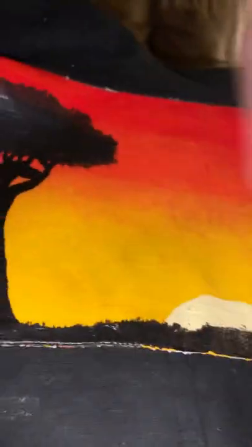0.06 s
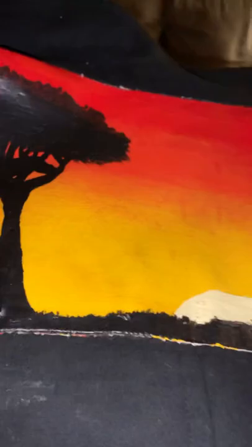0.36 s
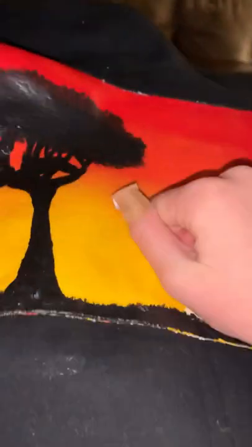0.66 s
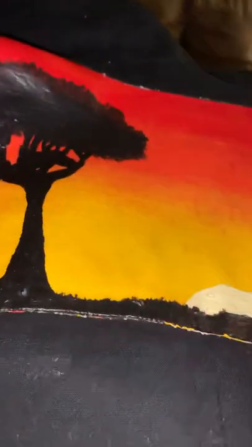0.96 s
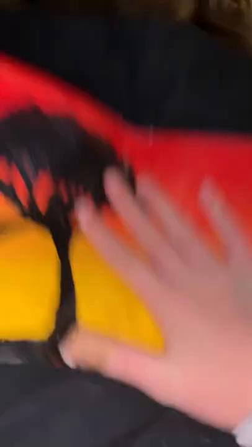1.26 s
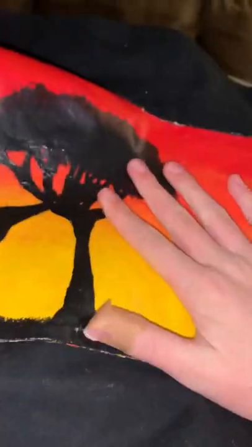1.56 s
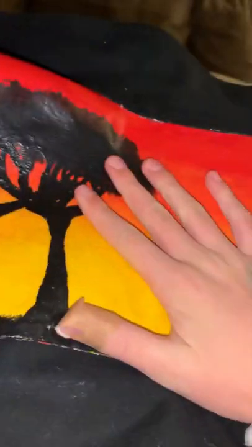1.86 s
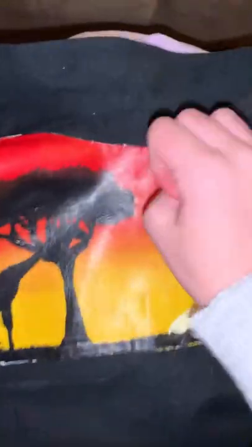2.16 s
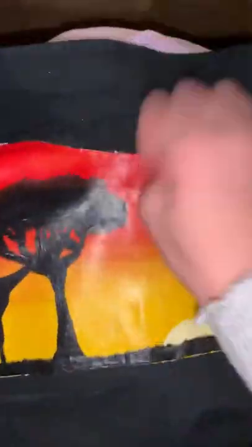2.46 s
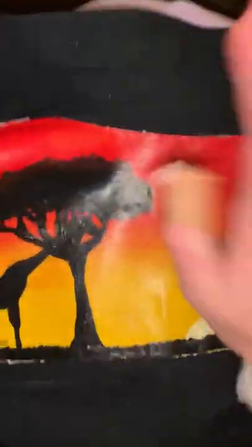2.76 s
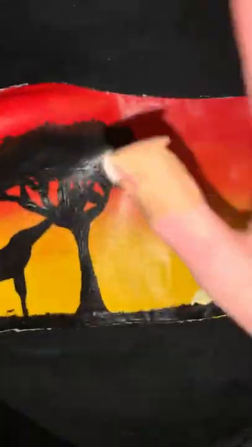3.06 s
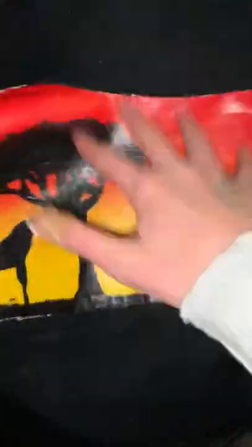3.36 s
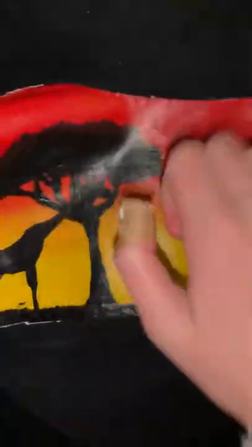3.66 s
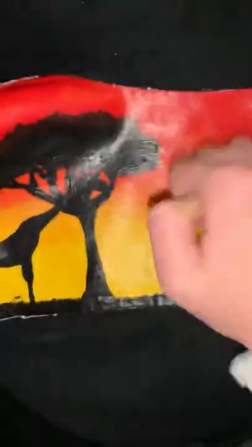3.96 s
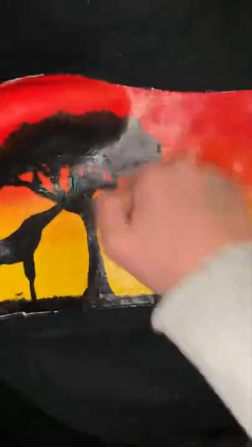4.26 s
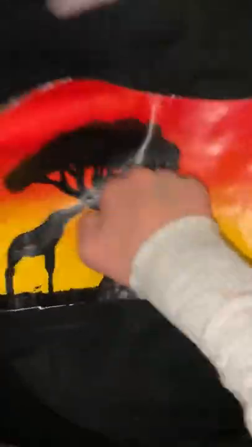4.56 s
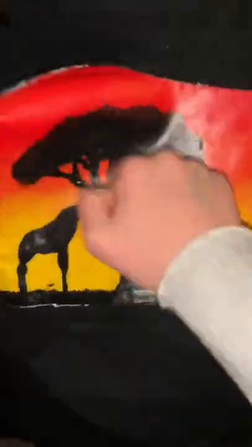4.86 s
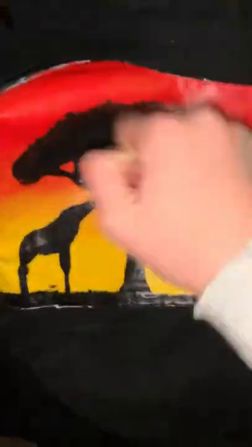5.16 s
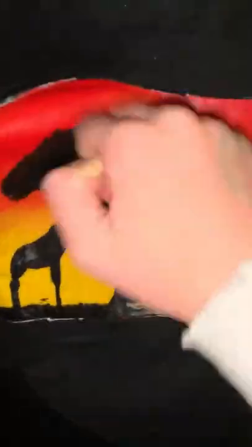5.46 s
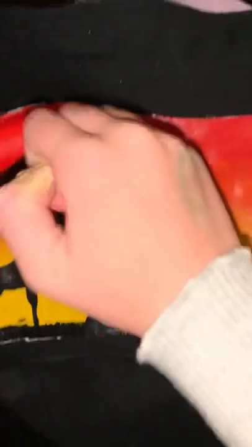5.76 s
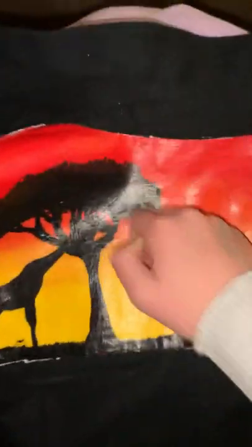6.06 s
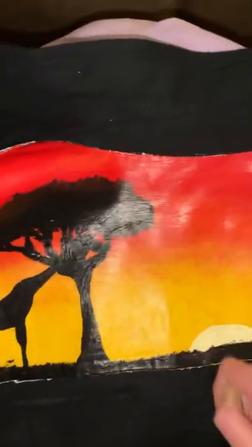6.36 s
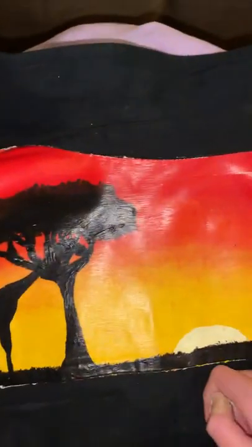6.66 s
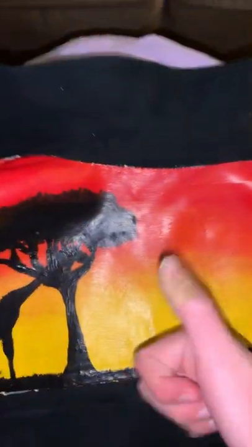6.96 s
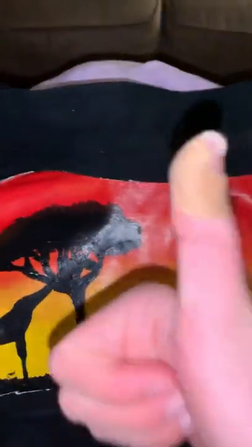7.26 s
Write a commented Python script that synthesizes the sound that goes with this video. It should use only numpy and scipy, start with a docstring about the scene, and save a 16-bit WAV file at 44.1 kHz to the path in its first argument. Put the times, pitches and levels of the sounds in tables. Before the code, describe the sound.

Long fingernails tap sharply on a stiff painted cloth, close up, with light brushing in a quiet room.

```python
"""Long fingernails tap a stiff, sealed painting on cloth lying over a sofa, close to a phone.
Each blow sends a bending wave through the paint skin: treble first, bass last, a short falling 'pock'.
Nails tick, the hand brushes the cloth between blows, and a quiet room answers softly over a low hum.
The phone's two microphone ports hear it all in stereo."""
import sys
import numpy as np
from scipy import signal
from scipy.fft import rfft, irfft, next_fast_len
from scipy.io import wavfile

SR = 44100
rng = np.random.default_rng(int(sys.argv[2]) if len(sys.argv) > 2 else 0)


def wrap_up_sound(samples):
    """Save the sound to the file named by the first command line argument, as 16-bit audio."""
    columns = np.atleast_2d(samples).T
    # keep every value between -1 and 1, then stretch to whole-number steps
    tamed = np.clip(columns, -1, 1)
    steps = np.round(tamed * 32767).astype(np.int16)
    wavfile.write(sys.argv[1], SR, steps)


N = 331627
TAP_SIZE, TAIL_SIZE = 8192, 20480  # samples in one tap and in the room's tail


def undb(db):
    """Decibels to gain."""
    return 10 ** (np.asarray(db) / 20)


def along(points, f):
    """Read a curve of (f/Hz, value) points on a log-frequency axis."""
    hz, value = np.transpose(points)
    return np.interp(np.log(np.maximum(f, 1)), np.log(hz), value)


def colour(x, points):
    """EQ by a curve of (f/Hz, level/dB) points."""
    size = next_fast_len(x.shape[-1], True)
    gain = undb(along(points, np.fft.rfftfreq(size, 1 / SR)))
    return irfft(rfft(x, size) * gain, size)[..., :x.shape[-1]]


def unit(x):
    """Scale to rms 1."""
    return x / np.sqrt(np.mean(x ** 2))


def hump(f, hz, q):
    """Power response of one damped resonance."""
    return 1 / (1 + (q * (f / hz - hz / f)) ** 2)


def causal(gain):
    """The minimum-phase spectrum with this gain: a sharp attack with no pre-ring."""
    cepstrum = irfft(np.log(gain + 1e-6))
    half = len(cepstrum) // 2
    cepstrum[1:half] *= 2
    cepstrum[half + 1:] = 0
    return np.exp(rfft(cepstrum))


def add(track, s, x):
    """Mix x into the track, starting at s seconds."""
    i = int(s * SR)
    track[..., i:i + x.shape[-1]] += x[..., :N - i]


def diffuse(size):
    """Noise from all sides: near mono in the bass, widest in the mids."""
    # stereo width of diffuse sound: f/Hz, side over mid/dB
    width = [(60, -26.5), (200, -20), (400, -8.5), (750, 2), (2500, -6), (4500, -10.5), (8000, -12)]
    mid, side = rng.standard_normal((2, size))
    side_gain = undb(along(width, np.fft.rfftfreq(size, 1 / SR)))
    left_right = rfft(mid) + np.array([[1], [-1]]) * side_gain * rfft(side)
    return irfft(left_right / np.sqrt(1 + side_gain ** 2), size)


def room_tone(level_db=-51.5):
    """The bed: the low, steady hum and air of the house."""
    # tone of the hum and air: f/Hz, level/dB
    hum_eq = [(24, -28.5), (34, -19.5), (52, -2), (78, -12.5), (108, -5), (149, -4.5), (180, -11),
              (256, -12), (363, -26.5), (607, -33), (1070, -33), (1520, -28), (2280, -36.5), (4740, -64.5),
              (6380, -55.5), (12000, -56), (16000, -68.5)]
    hum = colour(diffuse(next_fast_len(N, True)), hum_eq)
    return undb(level_db) * unit(hum)[:, :N]


def reverb(x, wet_db=-17.5, predelay_s=.003, build_s=0.0034):
    """A furnished room, from a new spot each time: echoes thicken, each octave dies at its own rate."""
    # tone of the reflections: f/Hz, level/dB
    tail_eq = [(50, -16), (120, -0.5), (250, -3.5), (450, -7), (800, 3.5), (1400, -7), (2500, -1.5),
               (5000, -2.5), (12000, -4)]
    # the room's decay: f/Hz, time to fall 60 dB/s
    t60 = [(100, 0.4), (300, .47), (700, 0.47), (1800, 0.51), (5000, 0.38), (12000, 0.34)]
    t = np.arange(TAIL_SIZE) / SR
    f = np.maximum(np.fft.rfftfreq(TAIL_SIZE, 1 / SR), 1)
    noise = rfft(colour(diffuse(TAIL_SIZE), tail_eq))
    tail = 0
    for hz in 32 * 2. ** np.arange(10):
        octave = np.maximum(1 - np.abs(np.log2(f / hz)), 0)
        decay = np.exp(-np.log(1000) * t / along(t60, hz))
        tail = tail + irfft(noise * octave) * decay
    tail *= np.clip((t - predelay_s) / build_s, 0, 1)
    tail *= undb(wet_db) / np.sqrt(np.sum(tail ** 2) / 2)
    return signal.fftconvolve(x[None], tail, axes=1)[:, :N]


def cloth_hiss(size, grain_db=3, grain_samples=64):
    """Threads catch and slip: bright, grainy noise of rms 1."""
    # tone of the slipping threads: f/Hz, level/dB
    thread_eq = [(1000, -23), (3000, -4), (4800, -2), (6300, 1.5), (8500, -8), (11000, -4.5), (15000, -10)]
    catches_db = grain_db * rng.standard_normal(size // grain_samples + 1)
    catches = undb(np.repeat(catches_db, grain_samples)[:size])
    return unit(colour(rng.standard_normal(size) * catches, thread_eq))


def brushing(attack_share=.3):
    """The hand slides on the cloth: hiss over the sheet's dull rub, swelling fast and fading slowly."""
    # strokes of skin and sleeve: peak t/s, length/s, hiss level/dB, rub level/dB
    strokes = [(0.139, 0.067, -50.5, -57.5), (.232, .02, -69, -70.5), (.64, 0.071, -75.5, -79.5),
               (0.755, 0.031, -67.5, -50.5), (2.066, 0.064, -87, -49), (2.662, .016, -68, -81.5),
               (6.146, 0.12, -59.5, -57.5), (6.304, .06, -73.5, -57.5)]
    # tone of the rubbed sheet: f/Hz, level/dB
    rub_eq = [(60, -11.5), (150, 10), (400, -0.5), (750, -4.5), (1500, -16), (4000, -27), (10000, -52.5)]
    t = np.arange(N) / SR
    threads = cloth_hiss(N)
    rub = unit(colour(rng.standard_normal(N), rub_eq))
    out = np.zeros(N)
    for s, length, hiss_db, rub_db in strokes:
        slope_s = length * np.where(t < s, attack_share, 1 - attack_share)
        pressure = np.exp(-((t - s) / slope_s) ** 2)
        out += pressure * (undb(hiss_db) * threads + undb(rub_db) * rub)
    return out


def rustle(attack_s=0.014, fade_s=0.042):
    """The cloth shifts and settles after a blow."""
    t = np.arange(TAP_SIZE) / SR
    attack = np.minimum(t / attack_s, 1)
    release = np.exp(-(np.maximum(t - attack_s, 0) / fade_s) ** 2)
    return cloth_hiss(TAP_SIZE) * attack * release


def creases(pock, scatter_db=-9, fade_s=0.0039, crossover_hz=900):
    """Creases in the paint scatter the short waves, differently at every spot."""
    t = np.arange(TAP_SIZE) / SR
    f = np.fft.rfftfreq(TAP_SIZE, 1 / SR)
    echoes = rng.standard_normal(TAP_SIZE) * np.exp(-t / fade_s)
    echoes *= undb(scatter_db) / np.sqrt(np.sum(echoes ** 2))
    short_waves = f ** 2 / (f ** 2 + crossover_hz ** 2)
    return irfft(rfft(pock) * (1 + short_waves * rfft(echoes)))


def bending_wave(f, travel_ms, dispersion=.6):
    """Spectrum of a path across the sheet that takes travel_ms at 1 kHz; the bass arrives last."""
    turns_per_ms = (f / 1000) ** (1 - dispersion) / (1 - dispersion)
    return np.exp(-2j * np.pi * turns_per_ms * travel_ms)


def tap(force_db, knock_hz, thump_db, clack_hz, clack_db, snap_db, tick_db, detour_ms, reflection):
    """One nail contact: heavily damped resonances and a gritty tick, spread into a falling chirp."""
    f = np.maximum(np.fft.rfftfreq(TAP_SIZE, 1 / SR), 1)
    t = np.arange(TAP_SIZE) / SR
    thump = undb(thump_db) * hump(f, hz=79.7, q=0.77)  # the sheet sinks into the cushion
    knock = hump(f, knock_hz, q=0.71) ** 2  # the paint skin flexes
    clack = undb(clack_db) * hump(f, clack_hz, q=1.6) ** 2  # the dent under the nail
    snap = undb(snap_db) * hump(f, hz=3360, q=0.62) ** 2  # the nail itself
    body = causal(thump + knock + clack + snap)
    # the nail's edge skids over the grain of the paint for a few milliseconds
    grit = rng.standard_normal(TAP_SIZE) * np.exp(-t / 0.0015)
    grit /= np.sqrt(np.sum(grit ** 2))
    tick = undb(tick_db) * causal(hump(f, hz=6540, q=.56) ** 2) * rfft(grit)
    direct = bending_wave(f, travel_ms=2.2)
    # a fold throws the wave back; the two paths comb, giving each spot its own hollow tone
    folded = reflection * direct * bending_wave(f, detour_ms)
    return undb(force_db) * irfft((body + tick) * (direct + folded))


def tapping():
    """Two-finger blows stir the cloth, light touches fall between; returns close sound and reverb."""
    # single nails, ahead of a blow or as the hand settles: t/s, force/dB, clack/dB, snap/dB, tick/dB
    touches = [(.435, 22.5, -28, -33.5, -39.5), (0.8117, -6.5, -9, -22.5, -35),
               (1.2265, 21.5, -12.5, -21, -37.5), (2.0522, -5, -21, -38, -55),
               (3.2454, 18.5, -27, -29.5, -38.5), (3.3122, 1.5, -20, -31, -33), (6.1228, 4, -33, -43, -46),
               (6.2446, -2.5, -31.5, -34, -48)]
    # blows of the hand: t/s, force/dB, knock f/Hz, thump/dB, clack f/Hz, clack/dB, snap/dB, tick/dB,
    # detour via a fold/ms, fold reflection/ratio, second finger's lag/ms (negative: early), its level/dB
    blows = [(0.0980, 39, 301, -4, 1370, -24.5, -34.5, -40.5, .8, 0.15, -1.1, -11),
             (0.4393, 40.5, 285, -10.5, 1640, -30.5, -37.5, -47.5, 1.32, -.28, 1.75, -10),
             (1.2299, 40.5, 288.4, -3.5, 1230, -18.5, -30.5, -34.5, 1.29, -0.26, 1.3, -4),
             (2.2098, 27, 309, 2, 1485, -17.5, -35.5, -53, 2.13, 0.17, 4.5, -15),
             (2.4861, 25.5, 300, 8.5, 1456, -16.5, -35, -40, 1.396, -0.4, 5.5, -5.5),
             (2.8013, 40, 264, -8, 1645, -23, -38.5, -41.5, 2.02, -0.18, -7, -4.5),
             (3.2195, 38, 293, -5, 1580, -21, -36, -37, .99, 0.32, 3.5, -18),
             (3.7143, 27.5, 263, 5, 1070, -18.5, -33.5, -51, .83, 0.26, -3.5, -1),
             (4.0009, 37.5, 287, -8.5, 1340, -30, -57, -56, .95, 0.28, 3.5, -15),
             (4.2629, 32.5, 281, -4.5, 1450, -21.5, -43, -61, 0.942, 0.45, 0.2, -10),
             (4.5095, 32.5, 317, -1, 1500, -20.5, -39.5, -62, 1.314, -0.13, 2.1, -9),
             (4.7790, 38, 253, -4.5, 1340, -25, -53, -56.5, 0.618, -.35, 4.5, -19.5),
             (5.0466, 28.5, 248, 5.5, 1450, -11.5, -38, -38.5, 1.81, 0.25, 2, -15.5),
             (5.3094, 35.5, 245, -4.5, 1464, -19.5, -41.5, -59, 1.01, 0.42, 1.86, -6.5),
             (5.5788, 30, 262, 1.5, 1350, -12.5, -38.5, -43.5, 1.837, 0.2, 1, -8.5),
             (5.8591, 30, 272, 6.5, 1750, -20, -33, -48, 0.93, 0.29, 9, -10)]  # in both tables the layer levels are relative to the force
    close, wet = np.zeros(N), np.zeros((2, N))
    contacts = []
    for s, force_db, clack_db, snap_db, tick_db in touches:
        touch = tap(force_db, knock_hz=283, thump_db=-4, clack_hz=1150, clack_db=clack_db,
                    snap_db=snap_db, tick_db=tick_db, detour_ms=0.97, reflection=.15)
        contacts.append((s, touch))
    for s, *voice, lag_ms, second_db in blows:
        force_db, knock_hz, thump_db, clack_hz, clack_db, snap_db, tick_db, *fold = voice
        first = tap(*voice)
        # the second finger has little of the arm's weight behind it: less thump, more clack
        second = tap(force_db + second_db, knock_hz, thump_db - 10,
                     clack_hz, clack_db + 3, snap_db, tick_db, *fold)
        contacts += [(s, first), (s + lag_ms / 1000, second)]
        rustle_db = -54.5 + 0.15 * (force_db + tick_db)  # sharper blows stir the cloth more
        add(close, s, undb(rustle_db) * rustle())
    for s, contact in contacts:
        pock = creases(contact)
        add(close, s, pock)
        add(wet, s, reverb(pock))
    return close, wet


def scene(far_left_db=1.3, right_lag_s=.000238):
    """The stereo mix: close taps reach the two ports unevenly; the room leans a little to the left."""
    # the sheet's uneven radiation towards the ports: f/Hz, right over left/dB
    right_lift = [(60, -1.3), (250, 0.7), (500, -3), (750, 18), (1050, 4), (1400, 1.5), (2200, -2),
                  (2800, 1), (4500, 1.2)]
    # the ports' own phase responses: f/Hz, right port's lead/rad
    port_lead = [(30, .1), (110, .29), (180, .48), (350, 1.08), (600, 2), (900, 2.5), (1400, 2.2),
                 (2000, 2.3), (3500, 3.4), (4700, 3.9)]
    taps, tap_reverb = tapping()
    brush = brushing()
    size = next_fast_len(N)
    f = np.fft.rfftfreq(size, 1 / SR)
    sides = np.array([[-.5], [.5]])  # left, right
    far = (tap_reverb + reverb(brush) + room_tone()) * undb(-sides * far_left_db)
    panned_taps = rfft(taps, size) * undb(sides * along(right_lift, f))
    ports = panned_taps + rfft(brush + far, size)
    lead = along(port_lead, f) - 2 * np.pi * f * right_lag_s  # treble reaches the left port first
    return irfft(ports * np.exp(1j * sides * lead), size)[:, :N]


def record(dry, low_cut_hz=21, ceiling=.95, high_cut_hz=15800):
    """The phone drops the deepest bass, soft-clips the highest peaks and cuts the top."""
    thinned = signal.sosfilt(signal.butter(2, low_cut_hz, "high", fs=SR, output="sos"), dry)
    rounded = thinned / (1 + (thinned / ceiling) ** 8) ** (1 / 8)
    return signal.sosfilt(signal.ellip(8, .2, 70, high_cut_hz, fs=SR, output="sos"), rounded)


dry = scene()
out = record(dry)
wrap_up_sound(out)
```